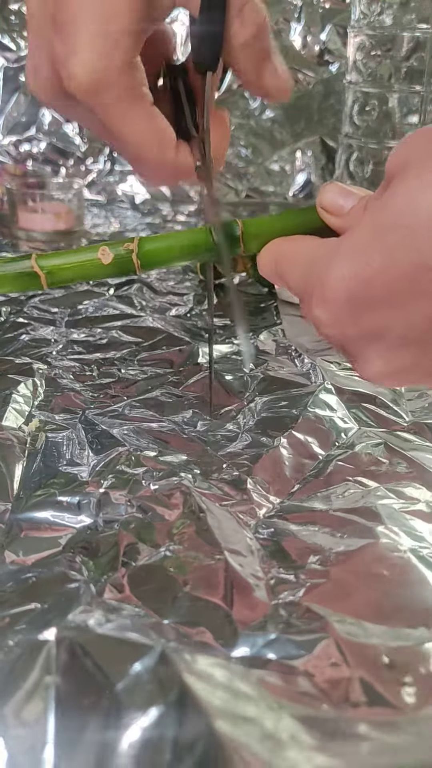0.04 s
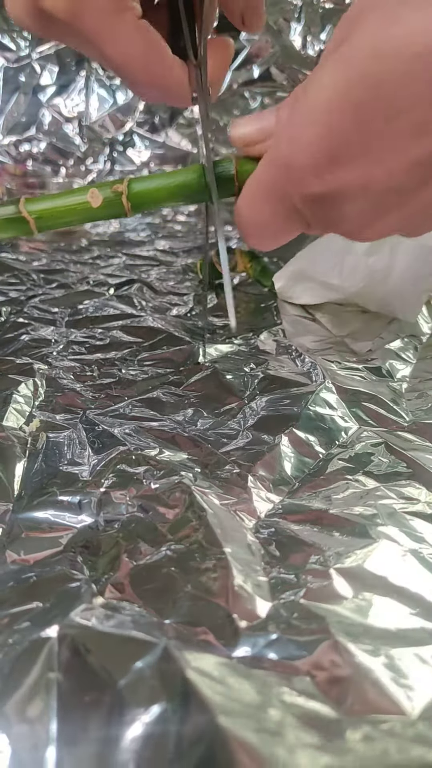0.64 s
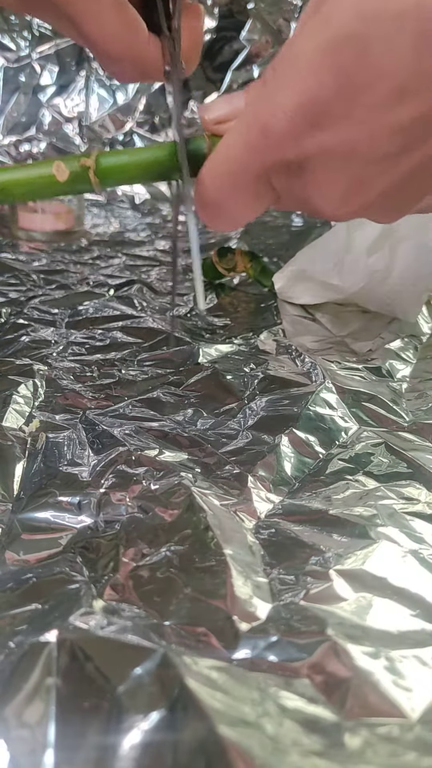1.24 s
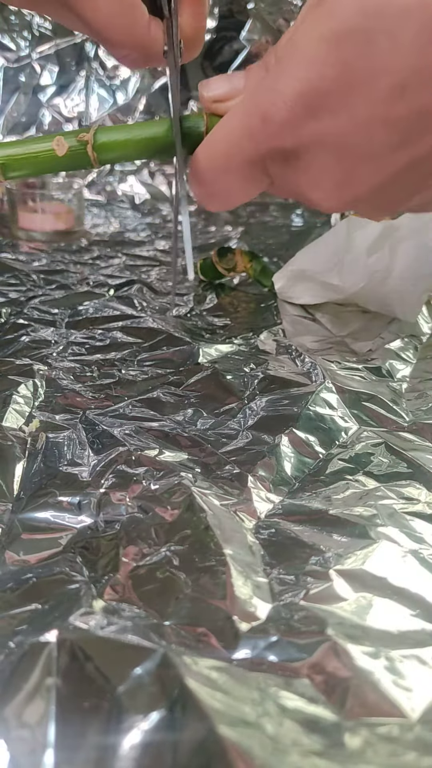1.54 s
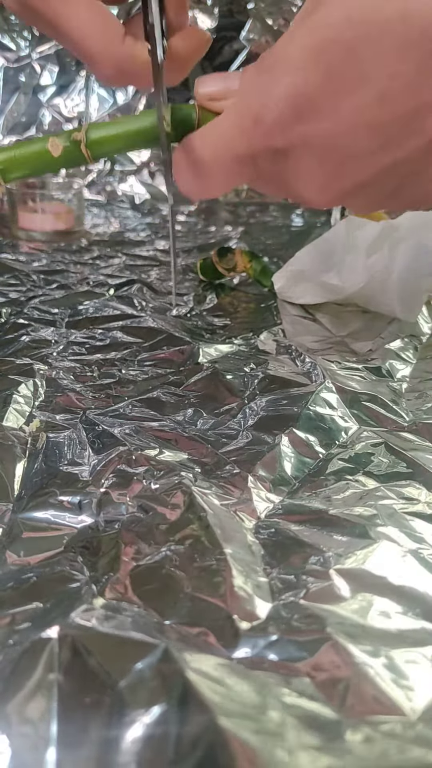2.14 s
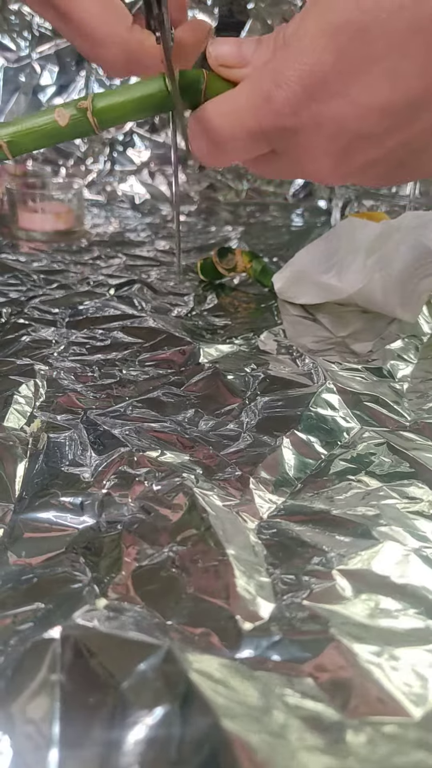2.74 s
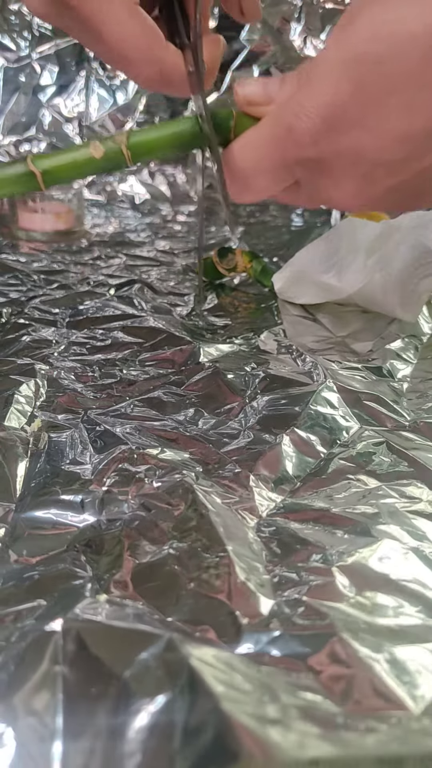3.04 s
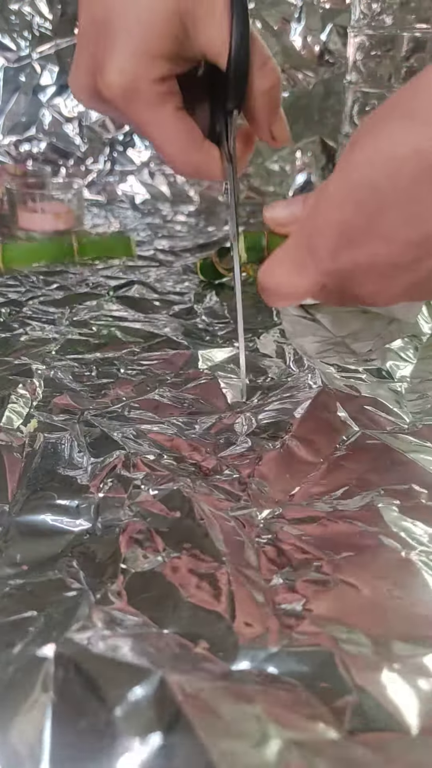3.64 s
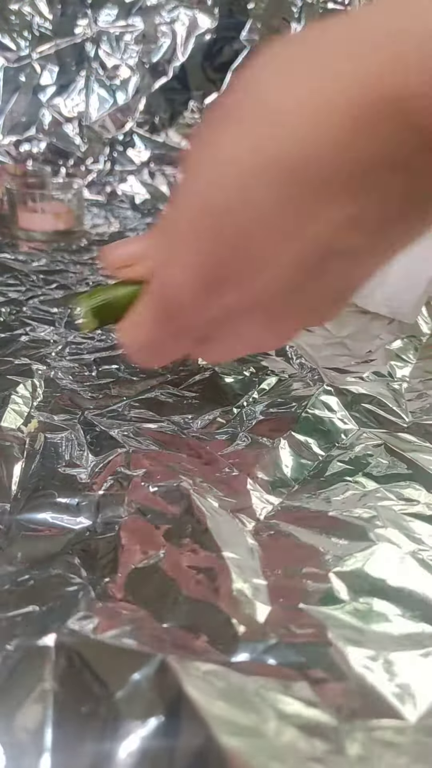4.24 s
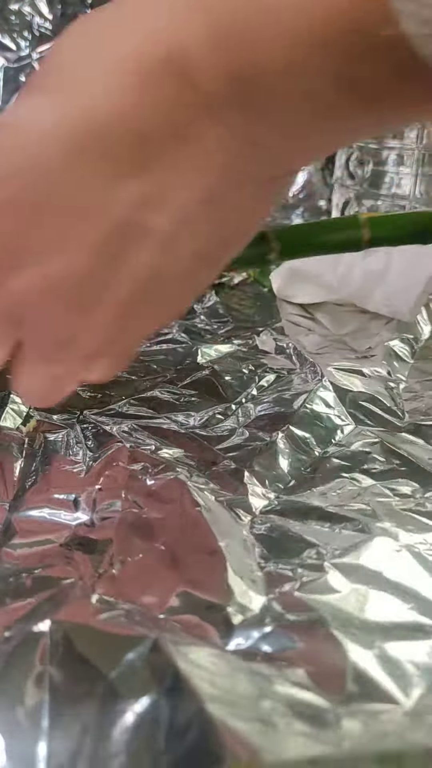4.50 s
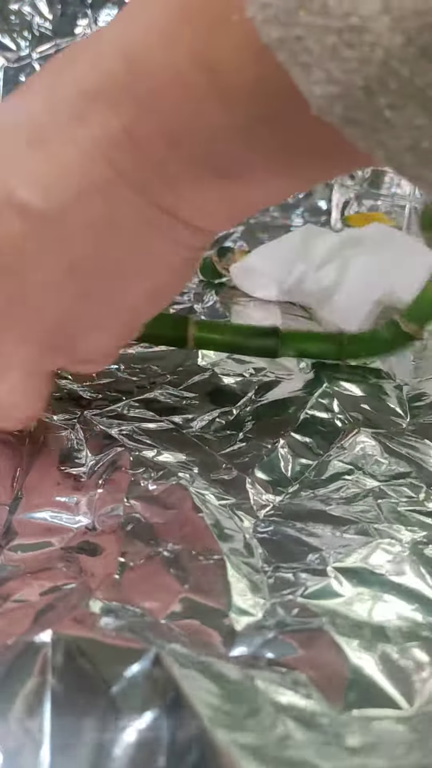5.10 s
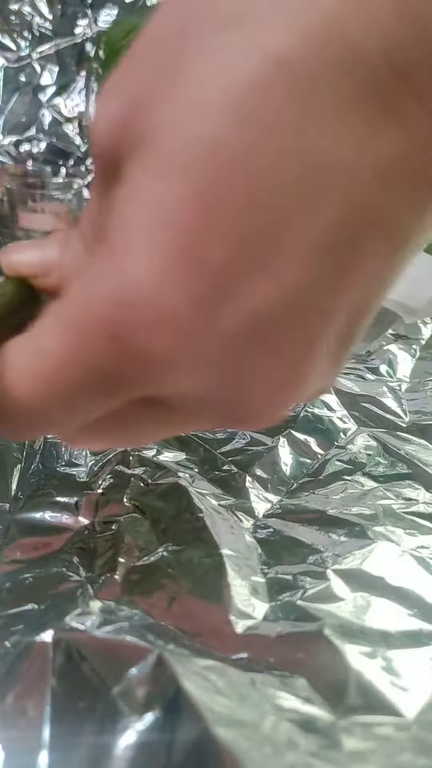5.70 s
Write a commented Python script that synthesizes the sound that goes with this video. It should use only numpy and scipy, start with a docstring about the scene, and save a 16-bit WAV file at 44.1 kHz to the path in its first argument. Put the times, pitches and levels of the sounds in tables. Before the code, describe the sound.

Scissors crunch slowly through a thick plant stalk, then clack down on a table as aluminium foil crinkles.

```python
"""Scissors cutting a stalk over foil

Scissors bite through a thick green stalk over a foil-covered table in a small, fairly live room.
Fibres snap and jolt the steel blades; the stalk cracks and later drops on the foil. The scissors
are put down with a clack. The pieces are moved about, knocking on the table and pressing the foil,
whose creases flip and crinkle."""
import sys
import numpy as np
from scipy import signal
from scipy.fft import rfft, irfft, next_fast_len
from scipy.io import wavfile
from scipy.ndimage import uniform_filter1d

SR = 44100
rng = np.random.default_rng(int(sys.argv[2]) if len(sys.argv) > 2 else 0)


def wrap_up_sound(samples):
    """Save the sound to the file named by the first command line argument, as 16-bit audio."""
    columns = np.atleast_2d(samples).T
    # keep every value between -1 and 1, then stretch to whole-number steps
    tamed = np.clip(columns, -1, 1)
    steps = np.round(tamed * 32767).astype(np.int16)
    wavfile.write(sys.argv[1], SR, steps)


N = 258416

# fibres giving way: t/s, level/dB, relative body/dB, body f/Hz, ping f/Hz, left-right/dB
FIBRE_SNAPS = [(0.0826, -35.5, -23, 2500, 8250, 5), (0.1258, -32.5, -29, 2520, 8300, 8),
               (1.2117, -42.5, -14, 2500, 7400, -3.5), (1.368, -48.5, -14, 3000, 7550, 9),
               (1.383, -39, -25.5, 2500, 7050, 1), (1.3875, -47, -23, 2490, 7000, 3.5),
               (1.4145, -39.5, -25, 2500, 7550, -1), (1.4438, -45, -23.5, 2500, 7100, 1),
               (1.455, -41.5, -31, 2500, 6740, 0), (1.5539, -35, -30, 2500, 8100, 12),
               (1.5755, -29.5, -22, 4000, 7700, 0), (1.6252, -30, -27, 2500, 7800, 7),
               (1.6365, -33, -31, 2500, 7700, -2), (1.6444, -22.5, -13, 2200, 4560, 4.5),
               (1.648, -28, -13, 2500, 7300, 0), (1.6744, -31, -33, 2500, 7800, 7),
               (1.6817, -29, -26, 2500, 7650, -1), (1.6853, -18.5, -18.5, 2480, 7800, 8),
               (1.6972, -30, -22, 2500, 7740, 3), (1.7263, -15, -23, 2280, 8150, -3),
               (1.728, -16, -13.5, 2500, 5700, 3.5), (1.741, -25.5, -30, 2400, 7600, 8),
               (2.2982, -31.5, -12.5, 4450, 4320, -0.5), (2.2989, -33, -22.5, 4400, 7530, 8),
               (2.761, -51.5, -23, 2500, 7400, 12), (2.823, -58, -12, 2470, 7500, 15),
               (3.245, -38, -22, 2440, 7300, 3), (3.257, -41.5, -11, 2500, 7000, 0),
               (3.2948, -35, -31, 2500, 7800, 2), (3.334, -40, -25, 2460, 7500, -3),
               (3.3446, -36.5, -31, 2480, 7300, -1), (3.3645, -39, -26, 2530, 7800, 0),
               (3.392, -38.5, -18, 2500, 7300, 0), (3.431, -43, -20, 2500, 7600, 2),
               (3.438, -31.5, -15, 3500, 8400, 10.5), (3.4664, -35.5, -9.5, 4000, 7700, 4),
               (3.4917, -25, -10, 4460, 7700, -0.5), (3.4938, -29.5, -1, 4040, 6200, 1)]
# body of a tick pitched at BODY_HZ: f/Hz, level/dB
BODY_SPECTRUM = [(100, -23.5), (400, -14), (900, -1), (1600, 0.5), (2500, 5.5), (3500, 0), (5000, -10),
                 (9000, -29.5)]
BODY_HZ = 2500
# top-treble sparkle: f/Hz, level/dB
SPARKLE_SPECTRUM = [(5000, -17), (9000, 20.5), (10000, 2.5), (11200, 14), (12600, 0.5), (13800, 10),
                    (15600, -4), (17000, -14)]
# likeness of the two microphone ports: f/Hz, coherence/1
PORT_COHERENCE = [(150, .95), (280, .89), (500, .6), (1000, 0), (8000, 0)]


def from_db(db):
    """Decibels to gain."""
    return 10 ** (np.asarray(db) / 20)


def pan(left_right_db):
    """Stereo gains for a level difference."""
    return from_db(left_right_db * np.array([[.5], [-.5]]))


def rms_one(x):
    """Scale to unit rms."""
    return x / np.sqrt(np.mean(x ** 2) + 1e-20)


def at_hz(points, hz):
    """Read a table on a log-frequency axis."""
    f, value = np.transpose(points)
    return np.interp(np.log(np.maximum(hz, 1)), np.log(f), value)


def add(out, s, sound):
    """Mix a stereo sound in at time s."""
    i = max(0, round(s * SR))
    out[:, i:i + sound.shape[1]] += sound[:, :N - i]


def coloured(x, spectrum):
    """Minimum-phase filter with the given dB curve."""
    n = x.shape[-1]
    size = 2 * next_fast_len(n // 2 + 512)
    gain = from_db(at_hz(spectrum, np.fft.rfftfreq(size, 1 / SR)))
    cepstrum = irfft(np.log(gain))
    cepstrum[1:size // 2] *= 2
    cepstrum[size // 2 + 1:] = 0
    return irfft(rfft(x, size) * np.exp(rfft(cepstrum)))[..., :n]


def diffuse_noise(size):
    """White stereo noise, coherent in the bass, unrelated in the treble."""
    mid, side = rfft(rng.standard_normal((2, size)))
    coherence = at_hz(PORT_COHERENCE, np.fft.rfftfreq(size, 1 / SR))
    return irfft(np.sqrt(1 + coherence) * mid + np.sqrt(1 - coherence) * side * [[1], [-1]], size)


def burst(spectrum, rise_s, decay_s, crack_db=-np.inf, size=4096):
    """Tiny fractures or contacts around an optional main crack; the loudest 3 ms have rms 1."""
    t = np.arange(size) / SR
    envelope = (1 - np.exp(-(t / rise_s) ** 2)) * np.exp(-t / decay_s)
    force = diffuse_noise(size) * envelope
    arrival = np.argmax(envelope) + rng.integers(0, 9, 2)  # per port
    force[[0, 1], arrival] += from_db(crack_db) * np.linalg.norm(envelope)
    sound = coloured(force, spectrum)
    power = uniform_filter1d(sound ** 2, round(.003 * SR), mode="constant")
    return sound / np.sqrt(power.max(axis=1, keepdims=True))


def ring(hz, t60_s, rise_s, size=16384):
    """One struck mode; the ports differ more in phase where they are less coherent."""
    t = np.arange(size) / SR
    apart_rad = np.arccos(at_hz(PORT_COHERENCE, hz)) * rng.choice([-1, 1])
    phase_rad = rng.uniform(0, 2 * np.pi) + np.array([[0], [apart_rad]])
    envelope = from_db(-60 * t / t60_s) * (1 - np.exp(-t / rise_s))
    return np.sin(2 * np.pi * hz * t + phase_rad) * envelope


def ticks(rows, rise_s, decay_s, crack_db, ping_db, ping_width_hz, sparkle_db,
          stretch=0, sparkle_growth=0):
    """Bright bursts with ping and body; stretch and sparkle_growth (dB/dB) act on excess level."""
    out = np.zeros((2, N))
    # bare tick: f/Hz, level/dB
    tick_spectrum = [(300, -57), (1500, -31), (3000, -23), (4400, -8.5), (6000, -6), (7100, -2.5),
                     (7900, -1), (8600, -14), (9800, -32), (16000, -46.5)]
    hz = np.linspace(100, 18000, 180)
    median_db = np.median([row[1] for row in rows])
    for s, db, body_db, body_hz, ping_hz, pan_db in rows:
        excess_db = db - median_db
        times_s = np.array([rise_s, decay_s]) * from_db(stretch * excess_db)
        resonance_db = ping_db / (1 + ((hz - ping_hz) / ping_width_hz) ** 2)
        pinged_spectrum = np.column_stack([hz, at_hz(tick_spectrum, hz) + resonance_db])
        body_spectrum = [(f * body_hz / BODY_HZ, level) for f, level in BODY_SPECTRUM]
        tick = burst(pinged_spectrum, *times_s, crack_db, size=1024)
        tick += from_db(body_db) * burst(body_spectrum, *times_s, crack_db, size=1024)
        sparkle = burst(SPARKLE_SPECTRUM, *times_s, size=1024)
        sparkle *= from_db(sparkle_db + sparkle_growth * excess_db)
        add(out, s - times_s[0] / 2, from_db(db) * (tick * pan(pan_db) + sparkle))
    return out


def press(s, length_s, attack_s=0.0058, sag_db_per_s=11.5, release_db_per_s=381.5):
    """Envelope of a push: gives at once, settles under load, dies when the movement stops."""
    t = np.maximum(np.arange(N) / SR - s, 0)
    fall_db = sag_db_per_s * t + release_db_per_s * np.maximum(t - length_s, 0)
    return np.minimum(t / attack_s, 1) * from_db(-fall_db)


def room_tone():
    """Steady, bass-heavy background noise."""
    # background: f/Hz, level/dB
    tone_spectrum = [(15, -16), (30, -9.5), (44, 1), (60, -7.5), (92, -3), (127, -15.5), (159, -2.5),
                     (366, -8), (530, -12.5), (599, -15), (661, -18.5), (957, -14.5), (1610, -21.5),
                     (1910, -21.5), (3620, -30.5), (7570, -29.5), (9000, -40), (11700, -99.5),
                     (19800, -120)]
    return rms_one(coloured(diffuse_noise(N), tone_spectrum))


def fibre_snaps():
    """Fibres break between the blades; bigger fractures last longer and sparkle more."""
    return ticks(FIBRE_SNAPS, rise_s=0.0013, decay_s=0.00048, crack_db=-6, ping_db=9.5,
                 ping_width_hz=400, sparkle_db=-11.5, stretch=0.14, sparkle_growth=0.099)


def snap_rings():
    """Each fibre snap rings briefly at a few high pitches."""
    # ring of a snap: f/Hz, level/dB, t60/s
    snap_modes = [(2270, -12, 0.04), (2900, -22, .018), (4220, -6, .02), (4670, -7, 0.016),
                  (5550, -12.5, 0.0058), (6860, 7.5, 0.012), (7810, 7, 0.026), (9280, -10.5, .012)]
    out = np.zeros((2, N))
    for s, db, *_ in FIBRE_SNAPS:
        for hz, mode_db, t60_s in snap_modes:
            add(out, s, from_db(db + mode_db) * ring(hz, t60_s, rise_s=0.00078, size=2048))
    return out


def blade_singing():
    """Each snap jolts the steel blades, which sing on."""
    # long-ringing blade modes: f/Hz, level/dB, t60/s
    blade_modes = [(3849, -16, 1.3), (5798, -5.5, .93), (6000, -1, 0.54), (6105, -2, .6), (6505, -2, .6),
                   (6804, -2, .5), (7133, -1, 0.5), (7926, -1, .6)]
    jolts = np.zeros((1, N))
    for s, db, *_ in FIBRE_SNAPS:
        jolts[0, round(s * SR)] = from_db(db)
    steel = sum(from_db(db) * ring(hz, t60_s, rise_s=.002, size=65536) for hz, db, t60_s in blade_modes)
    return signal.fftconvolve(jolts, steel, axes=1)[:, :N]


def foil_creases(body_db=-16.5):
    """The loudest creases flip over singly, one tick each."""
    # crease flips: t/s, level/dB, ping f/Hz, left-right/dB
    flips = [(0.267, -39, 6820, 1), (0.3007, -30.5, 7050, -2), (0.316, -27, 6560, -1),
             (0.41, -31.5, 7500, -1), (0.456, -33.5, 7150, 3), (0.4893, -34, 7700, 6),
             (0.502, -35, 7800, 3), (0.5255, -31, 7440, 8), (0.6492, -28.5, 6800, 4),
             (0.7213, -38, 4290, -2), (0.7557, -23, 6550, -1), (0.7717, -27, 7950, 5),
             (0.797, -38, 7470, 6), (0.8442, -27, 8400, -4), (0.8904, -40, 7240, 0), (2.06, -36, 7810, 6),
             (2.983, -40, 7300, 4), (3.008, -35, 7250, -1), (3.092, -34, 8300, 3), (3.172, -39, 7000, 0),
             (3.217, -36, 6500, -2), (3.585, -21.5, 5700, 3), (3.602, -26, 7400, 3),
             (3.611, -18.5, 5030, 8), (3.618, -18, 7040, 2), (3.622, -19, 7660, 5), (3.649, -16.5, 5660, 0),
             (3.674, -19, 7500, 0), (3.7033, -22.5, 6860, -5), (3.7695, -35, 6970, 0),
             (3.8233, -32, 6670, -5), (3.8456, -30.5, 7700, 0), (3.9732, -26.5, 7800, 10),
             (3.9868, -24, 7300, 4), (4.0106, -16, 7040, 7.5), (4.0266, -26.5, 7070, 7),
             (4.122, -35, 7800, 9), (4.1673, -22.5, 7900, 5.5), (4.5007, -24, 6000, -4),
             (4.5156, -14.5, 7800, 1.5), (4.6137, -27, 7400, 5), (4.6265, -13.5, 7100, 2.5),
             (4.633, -18.5, 7400, -5), (4.746, -30, 7200, 6), (4.754, -27, 7400, -2),
             (4.7641, -19.5, 7600, 6.5), (4.7724, -25, 7340, -7), (4.7818, -26, 6630, 7),
             (4.805, -23, 7500, -2), (4.8428, -28, 6650, -5), (4.912, -20.5, 7660, 7),
             (5.0265, -38, 7000, -4), (5.053, -33, 6460, 4.5), (5.061, -28, 7600, -1),
             (5.068, -29, 7400, -7), (5.0771, -20.5, 7040, -3), (5.0926, -20, 7400, 2),
             (5.099, -18.5, 7550, 8), (5.1079, -20, 6900, 13), (5.1241, -18.5, 7600, -4),
             (5.128, -23.5, 5200, 8), (5.1446, -29, 7700, 15), (5.1711, -27, 7760, 13.5),
             (5.2878, -27, 7600, 5.5), (5.3644, -27.5, 6060, 1.5)]
    rows = [(s, db, body_db, BODY_HZ, ping_hz, pan_db) for s, db, ping_hz, pan_db in flips]
    return ticks(rows, rise_s=0.0015, decay_s=0.00067, crack_db=-4.5, ping_db=6.5,
                 ping_width_hz=200, sparkle_db=-17)


def foil_crinkle(creases_per_s=340, spread_db=4.5, flurry_s=.011, flurry_db=4, pan_db=6,
                 click_s=.00035, ping_s=.0009, ping_db=-5.5, facet_hz=(2700, 9500), rub_db=-18):
    """Tiny creases flip in flurries as the foil is pressed, over the hiss of things sliding on it."""
    # presses and drags: t/s, length/s, level/dB, relative body/dB
    presses = [(0.268, 0.047, -54, -11.5), (0.304, 0.043, -53, -11), (0.414, 0.063, -61.5, -13),
               (0.47, 0.038, -47.5, -9), (0.518, 0.023, -47, -11), (0.638, 0.043, -48, -16),
               (0.706, 0.04, -53, -7), (0.768, 0.078, -46, -7), (0.86, 0.045, -52.5, -9),
               (0.937, 0.02, -58, -11), (1.668, 0.008, -38, -21), (1.737, 0.029, -39, -27),
               (1.86, 0.18, -58.5, -5.5), (2.3, 0.04, -64, -22), (2.995, 0.089, -55.5, -25),
               (3.078, 0.012, -46.5, -8.5), (3.104, 0.088, -60, -10), (3.254, 0.046, -51, -11),
               (3.344, 0.05, -59, -10), (3.484, 0.024, -34, -9), (3.525, 0.078, -43, -10.5),
               (3.588, 0.021, -42, -8), (3.635, 0.0075, -58, -11), (3.673, 0.0036, -53, -3),
               (3.708, 0.29, -57.5, -4.5), (3.993, 0.14, -45.5, -7.5), (4.501, 0.022, -38.5, -10.5),
               (4.804, 0.058, -42, -7), (4.849, 0.034, -40.5, -14), (5.061, 0.086, -43, -3)]
    # crinkle: f/Hz, level/dB
    foil_spectrum = [(300, -21), (1500, -27), (3000, -6), (4700, -3), (6000, -5), (6900, -1.5),
                     (7800, -0.5), (8400, -5.5), (9300, -19.5), (10200, -18), (11300, -16), (13000, -26),
                     (15700, -24.5), (16500, -45)]
    crinkle_gain, body_gain = np.zeros((2, N))
    for s, length_s, db, body_db in presses:
        load = from_db(db) * press(s, length_s)
        crinkle_gain += load
        body_gain += from_db(body_db) * load
    t = np.arange(N) / SR
    steps_s = np.arange(0, t[-1], flurry_s)
    swing_db = np.interp(t, steps_s, rng.uniform(-flurry_db, flurry_db, len(steps_s)))
    age_s = np.arange(512) / SR
    grains = np.zeros((2, N))
    for i in np.flatnonzero(rng.random(N) < creases_per_s / SR):
        size_db = swing_db[i] + spread_db * min(rng.exponential(), 2.5)
        sides = pan(pan_db * rng.uniform(-1.08, 1))
        click = rng.standard_normal((2, len(age_s))) * age_s * np.exp(-age_s / click_s)
        cycles = rng.uniform(*facet_hz) * age_s + rng.random((2, 1))
        ping = np.sin(2 * np.pi * cycles) * age_s * np.exp(-age_s / ping_s)
        grain = rms_one(click) + from_db(ping_db) * rms_one(ping)
        add(grains, t[i], from_db(size_db) * sides * grain)
    drive = rms_one(grains) + from_db(rub_db) * diffuse_noise(N)
    crinkle = rms_one(coloured(drive, foil_spectrum))
    body = rms_one(coloured(drive, BODY_SPECTRUM))
    return crinkle_gain * crinkle + body_gain * body


def table_knocks(lag_s=0.0016, rise_s=0.00075, decay_s=0.02, modes_db=-2, scatter_db=2):
    """Bumps spread as bending waves: lows come later and last longer, and a few modes stand out."""
    # bumps (hard ones rap, soft ones boom): t/s, boom/dB, hardness/dB, boom f/Hz
    bumps = [(1.728, -42.5, -1, 187), (1.773, -34, 2, 190), (3.513, -39, -2, 166), (3.526, -37, -15, 164.6),
             (3.61, -44.5, -17, 158), (4.28, -35.5, -2, 246), (4.509, -30, -20, 204),
             (4.63, -38.5, -21, 215), (4.86, -47, 12.5, 225), (4.958, -29.5, 6.5, 270),
             (4.987, -39, -4, 292), (5.099, -32.5, -1.5, 287), (5.123, -38, 4, 286), (5.188, -40, -25, 212)]
    # table top under the foil: f/Hz, level/dB, t60/s
    table_modes = [(258.5, -4.5, 0.2), (383, 2, 0.13), (590, 3, 0.029), (820, -9, 0.08)]
    # low, middle and high parts of a bump: f/Hz, level/dB
    boom_spectrum = [(30, -45.5), (65, -33), (125, -14), (165, -1.5), (210, 3), (270, -2.5), (380, -12),
                     (900, -52.5)]
    thud_spectrum = [(100, -41), (240, -29), (340, -11), (420, -0.5), (570, -12), (750, -17.5), (2000, -57)]
    rap_spectrum = [(150, -52), (450, -2), (580, 10.5), (830, 15), (980, 12), (1200, 9), (1600, -4.5),
                    (4000, -38.5)]
    reference_hz = 210  # for boom_spectrum and the three times
    thud_hz, rap_hz, usual_boom_db = 430, 850, -33.5
    out = np.zeros((2, N))
    for s, boom_db, hardness_db, boom_hz in bumps:
        # harder and stronger bumps thud more
        thud_db = boom_db - 3 + 0.17 * hardness_db + 0.92 * (boom_db - usual_boom_db)
        blow = [(boom_hz, boom_db), (thud_hz, thud_db), (rap_hz, boom_db + hardness_db)]
        tuned_boom = [(hz * boom_hz / reference_hz, db) for hz, db in boom_spectrum]
        for spectrum, (hz, db) in zip((tuned_boom, thud_spectrum, rap_spectrum), blow):
            slowness = np.sqrt(reference_hz / hz)
            wave = burst(spectrum, rise_s * slowness, decay_s * slowness, crack_db=-3, size=8192)
            add(out, s + lag_s * reference_hz / hz, from_db(db) * wave)
        for hz, mode_db, t60_s in table_modes:
            gain = from_db(modes_db + mode_db + at_hz(blow, hz) + scatter_db * rng.standard_normal())
            add(out, s + lag_s * reference_hz / hz, gain * ring(hz, t60_s, rise_s))
    low_cut = signal.butter(2, 60, "high", fs=SR, output="sos")
    return signal.sosfilt(low_cut, out + 1e-18)


def blade_squeaks():
    """The blades slide on in the cut and rub their lowest singing mode into a faint squeak."""
    # slides: t/s, length/s, level/dB
    slides = [(1.872, .012, -53), (1.935, 0.022, -59), (1.959, .016, -52), (2.157, .008, -59)]
    # rubbed steel: f/Hz, level/dB
    squeak_spectrum = [(800, -39), (2200, -34), (3600, -7), (3850, 8), (4150, -18), (5500, -7),
                       (8000, -14.5), (10000, -33)]
    rubbing = sum(from_db(db) * press(s, length_s) for s, length_s, db in slides)
    return rubbing * rms_one(coloured(rng.standard_normal((2, N)), squeak_spectrum))


def scissors_clack(rise_s=0.0007, scatter_db_per_oct=2.5):
    """The handle meets the table, then the blades chatter to rest; returns (rattle, ringing)."""
    # contacts: t/s, contact/dB, decay/s, ring/dB, ring tilt/(dB/octave)
    contacts = [(4.279, -25.5, 0.0026, -20.5, -8), (4.856, -30, 0.0032, -39, 14),
                (4.8618, -27.5, 0.0018, -44, 14.5), (4.866, -19, 0.0022, -40, 11),
                (4.8716, -21, 0.0049, -48, 10), (4.878, -24.5, 0.002, -46, 1),
                (4.886, -30.5, 0.0034, -50, 4), (4.895, -29, 0.0029, -44, 9), (4.912, -32, 0.005, -44, 9),
                (4.926, -46, 0.0052, -50, 7)]
    # contact noise: f/Hz, level/dB
    rattle_spectrum = [(120, -17), (250, -5), (500, -9), (650, -4), (880, -11), (1320, -4), (1650, -9),
                       (2100, -2.5), (2700, -4.5), (3150, -10), (3700, -10.5), (5800, -10.5), (7600, -4),
                       (9100, -22), (16000, -37)]
    # scissors lying on the table: f/Hz, level/dB, t60/s
    scissor_modes = [(977, 0, .075), (1290, -6, .06), (1960, -14, .07), (2175, -16, .08), (2570, -15, .08),
                     (2696, -16, .12), (3075, -15, .11), (3700, -23, .1), (5216, -26, .08)]
    rattle, ringing = np.zeros((2, 2, N))
    lowest_hz = scissor_modes[0][0]
    for s, contact_db, decay_s, ring_db, tilt_db_per_oct in contacts:
        add(rattle, s, from_db(contact_db) * burst(rattle_spectrum, rise_s, decay_s))
        for hz, mode_db, t60_s in scissor_modes:
            octaves = np.log2(hz / lowest_hz)
            colour_db = octaves * (tilt_db_per_oct + scatter_db_per_oct * rng.standard_normal())
            add(ringing, s, from_db(ring_db + mode_db + colour_db) * ring(hz, t60_s, rise_s))
    return rattle, ringing


def faint_hiss():
    """A brief, very faint, thin high hiss at the end."""
    # hiss envelope: t/s, level/dB
    envelope = [(5.66, -100), (5.71, -68), (5.8, -67.5), (5.86, -86)]
    s, db = np.transpose(envelope)
    gain = from_db(np.interp(np.arange(N) / SR, s, db, left=-np.inf))
    return gain * rms_one(coloured(diffuse_noise(N), SPARKLE_SPECTRUM))


def room_echo(x, onset_s=0.0047, near_db=2, near_s=0.0017, size=32768):
    """Quick scatter from the foil nearby, then a diffuse tail that dies band by band."""
    # room decay: f/Hz, t60/s
    decay_times = [(150, .38), (500, .38), (1000, .36), (2000, .45), (4000, .56), (8000, .49), (14000, .38)]
    # tail colour: f/Hz, level/dB
    tail_spectrum = [(150, 0.5), (500, 2.5), (1500, -4), (4000, -5.5), (8000, -5), (10000, -6), (14000, -5)]
    t = np.arange(size) / SR
    hz = np.fft.rfftfreq(size, 1 / SR)
    noise_bins = rfft(diffuse_noise(size))
    edges_hz = np.geomspace(70, 18000, 10)
    tail = 0
    for low, high in zip(edges_hz, edges_hz[1:]):
        t60_s = at_hz(decay_times, np.sqrt(low * high))
        band = irfft(noise_bins * (hz >= low) * (hz < high))
        tail += band * from_db(-60 * t / t60_s)
    build_up = 1 - np.exp(-(t / onset_s) ** 2)
    tail = coloured(tail * build_up, tail_spectrum)
    near = diffuse_noise(size) * t * np.exp(-t / near_s)
    response = (rms_one(tail) + from_db(near_db) * rms_one(near)) / np.sqrt(size)
    return signal.fftconvolve(x, response, axes=1)[:, :N]


def scene():
    """Close sources plus room; crinkle, rattle and knocks excite the room most."""
    stalk = from_db(-2) * fibre_snaps() + from_db(-11.5) * snap_rings()
    creases = from_db(-9.5) * foil_creases()
    foil = from_db(0.5) * foil_crinkle()
    knocks = table_knocks()
    rattle, ringing = scissors_clack()
    scissors = from_db(-4.5) * (rattle + ringing)
    air = from_db(-51.03) * room_tone()
    blades = from_db(-38) * blade_singing() + blade_squeaks()
    direct = stalk + blades + creases + foil + knocks + scissors + faint_hiss()
    sends_db = [(stalk, -11), (creases, -10.5), (foil, -2), (knocks, -8), (rattle, -5.5), (ringing, -12)]
    sent = sum(from_db(db) * source for source, db in sends_db)
    return direct + room_echo(sent) + air


def record(dry):
    """Two microphone ports, the left louder except in the top treble; low-pass at 16.3 kHz."""
    # port balance: f/Hz, left-right/dB
    balance = [(80, 5.5), (160, 1), (300, 6.5), (1000, 1), (4000, 4), (8000, 0.5), (10500, 0.5),
               (14000, -5)]
    left = coloured(dry[0], [(hz, db / 2) for hz, db in balance])
    right = coloured(dry[1], [(hz, -db / 2) for hz, db in balance])
    top_cut = signal.ellip(10, .2, 80, 16300, fs=SR, output="sos")
    return signal.sosfilt(top_cut, [left, right])


dry = scene()
out = record(dry)
wrap_up_sound(out)
```